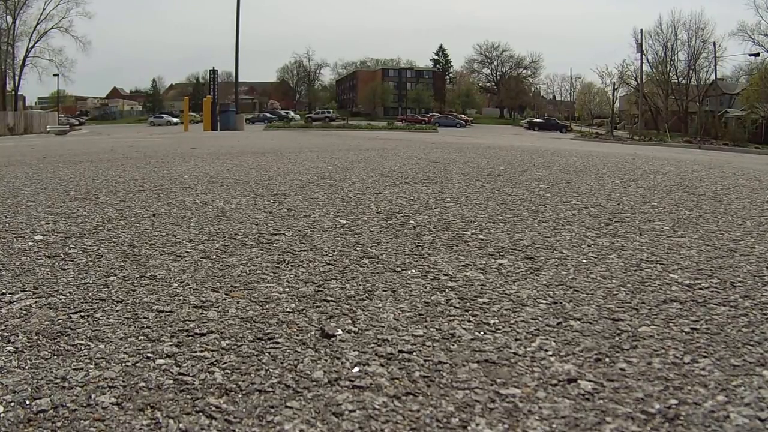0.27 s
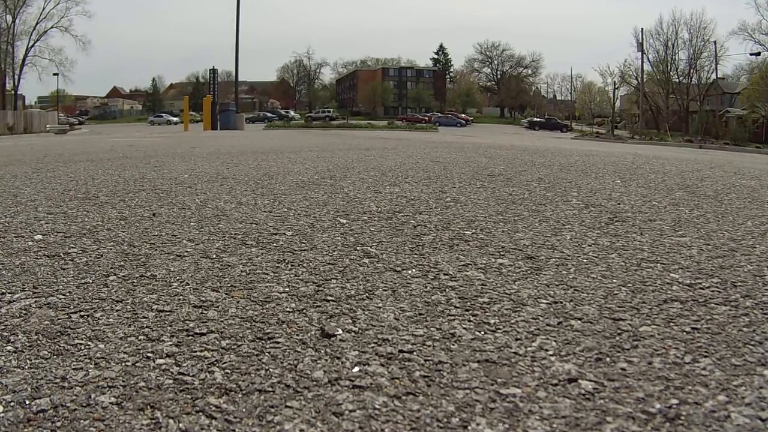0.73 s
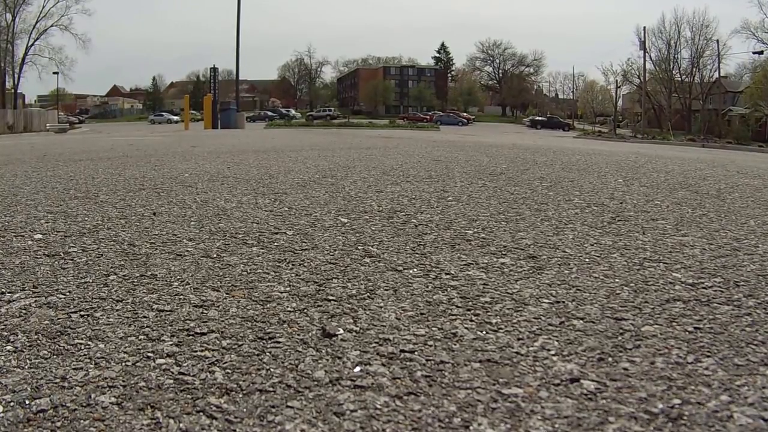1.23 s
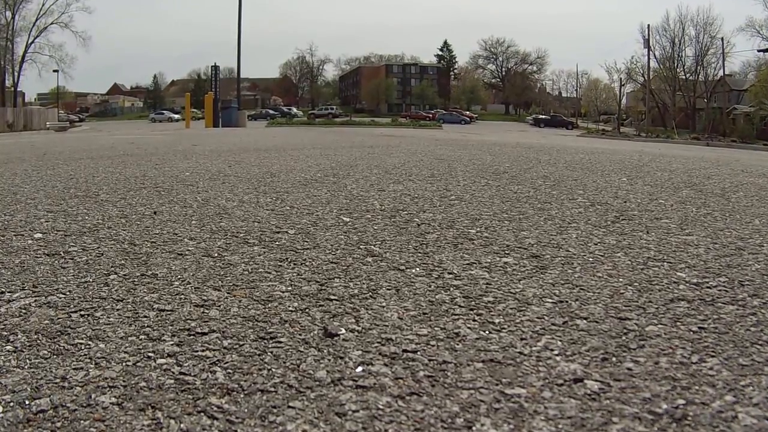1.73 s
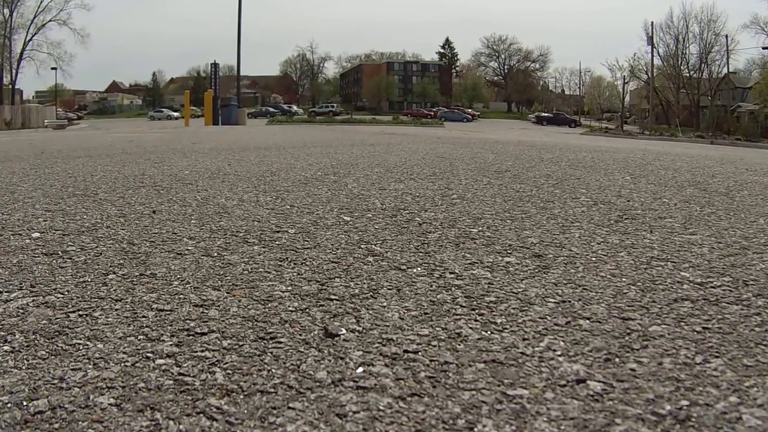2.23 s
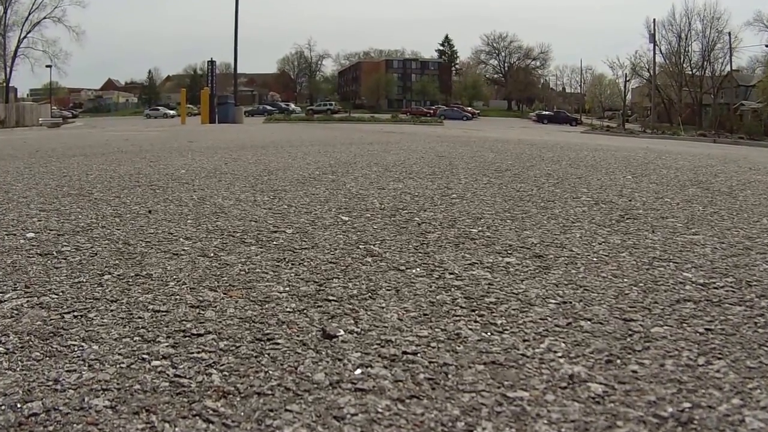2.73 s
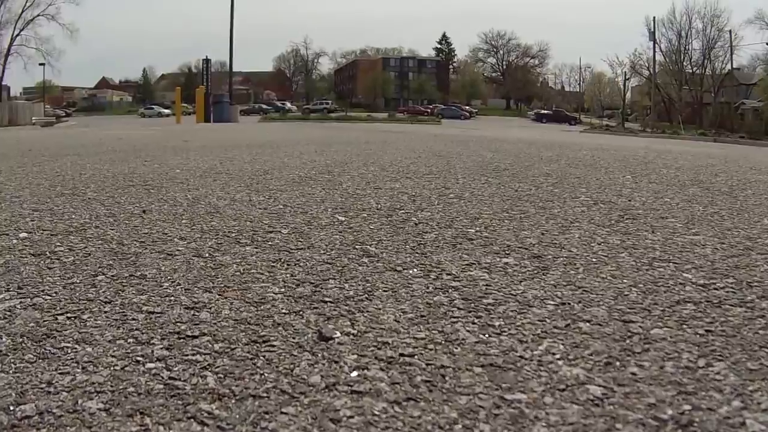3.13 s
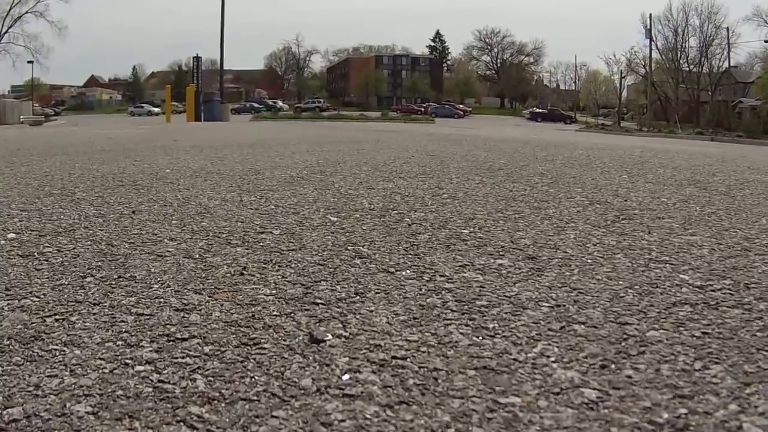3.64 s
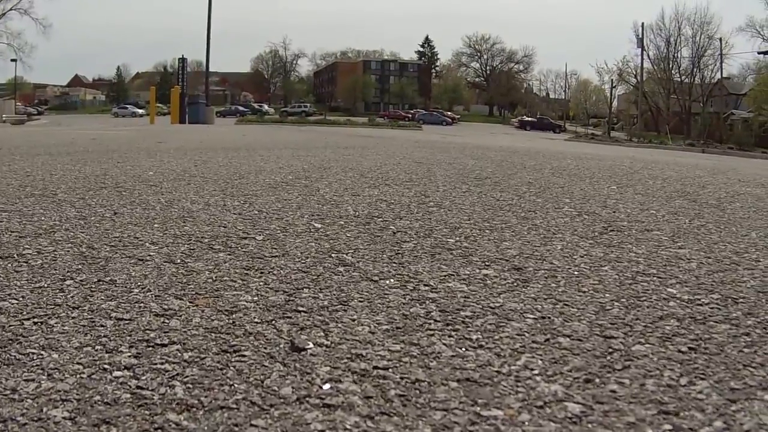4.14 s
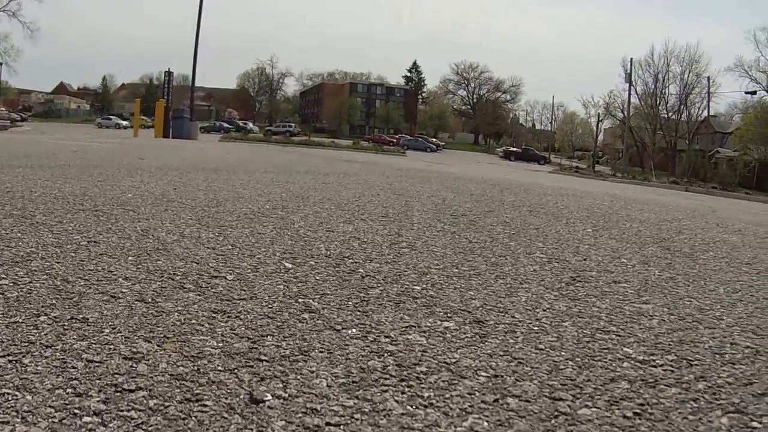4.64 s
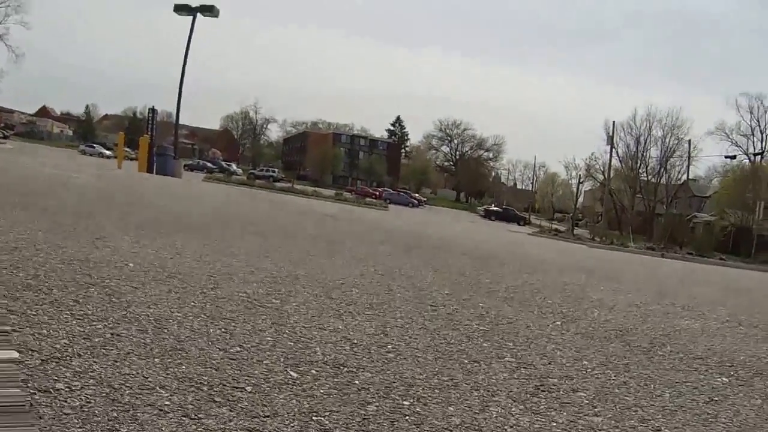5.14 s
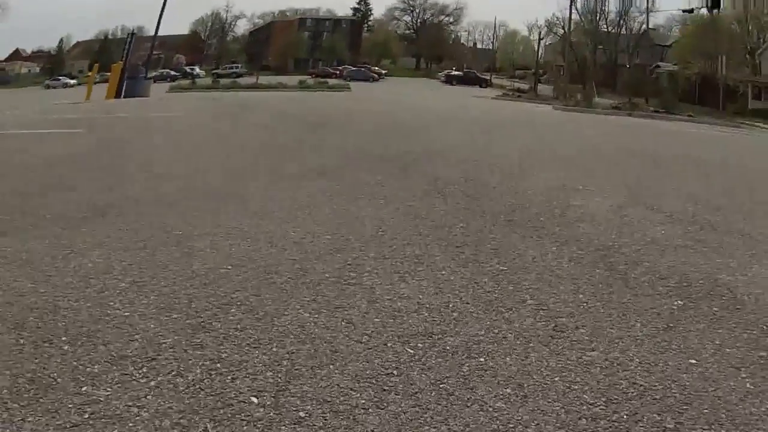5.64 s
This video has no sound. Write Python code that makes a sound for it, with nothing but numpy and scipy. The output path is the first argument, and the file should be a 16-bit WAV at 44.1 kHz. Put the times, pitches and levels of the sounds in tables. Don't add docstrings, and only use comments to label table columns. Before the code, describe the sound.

Faint wind, hum and hiss in an empty car park, then small quadcopter motors start with a piercing whine, spin up to a buzzing drone and lift off.

```python
import sys
import numpy as np
from scipy import signal
from scipy.fft import rfft, irfft, next_fast_len
from scipy.io import wavfile
from scipy.ndimage import uniform_filter1d, map_coordinates

SR = 44100
rng = np.random.default_rng(int(sys.argv[2]) if len(sys.argv) > 2 else 0)


def invert_db(level):
    return 10 ** (np.asarray(level, dtype=float) / 20)


def dump(signal):
    limited = np.clip(np.atleast_2d(signal).T, -1, 1)
    pcm = np.round(limited * 32767).astype(np.int16)
    wavfile.write(sys.argv[1], SR, pcm)


N = 258867
T = np.arange(N) / SR

# f/Hz, density/dB
HISS = [(60, 5), (240, 5.5), (600, 0), (2000, -5), (2350, -4), (3500, -11.5), (4500, -1), (5200, -10),
        (5800, -2), (7500, -8), (9300, -13), (12000, 1.5), (13600, -11.5), (15300, -8.5)]
# f/Hz, level/dB
HUM = [(1147, -63), (4587, -84), (6105, -73), (6858, -103), (7547, -91), (7838, -71), (10040, -75),
       (11380, -101), (12005, -66)]
# t/s, level/dB
CHIRPS = [(.08, -62), (.46, -57), (.8, -61), (1.25, -61), (1.62, -61)]
# f/Hz, density/dB
CHIRP_SPECTRUM = [(6400, -40), (6850, 1), (7200, -14), (7550, 1), (7900, -3), (8300, -40)]
# t/s, gain/dB
GAIN = [(1.91, 6), (2.2, 7.5), (2.45, 8.5), (3, -16)]

# t/s, level/dB
GUSTS = [(0, -48.5), (1.55, -49.5), (1.65, -55), (2.3, -53), (2.45, -36.5), (3.7, -34.5), (4.45, -40.5),
         (4.58, -31.5), (5.2, -27.5), (5.37, -22.5), (5.39, -31.5), (5.48, -38), (5.6, -38.5),
         (5.87, -37.5)]
# t/s, level over the flow/dB, half length/s
PUFFS = [(0, 13.5, .03), (.11, 8, 0.028), (.21, 8, .025), (.49, 8, 0.022), (.7, 3, 0.032),
         (.81, 8.5, 0.061), (.92, 6, 0.035), (1.1, 8, .04), (1.24, 5, 0.033), (1.41, 7, .03),
         (1.53, 4, 0.027), (2.7, 5, 0.081), (2.86, 4, .03), (3.11, 7, 0.045), (3.39, 2.5, 0.16),
         (4.77, 3, 0.048), (4.88, -6, .04), (5.0, -5, 0.053), (5.17, 5.5, 0.048), (5.235, 4, 0.012),
         (5.26, 4.5, .008), (5.275, 0, 0.011), (5.37, -4, 0.016), (5.41, 4, 0.034)]
# f/Hz, density/dB
BREEZE = [(15, -2), (45, -1.5), (100, -9), (200, -14), (500, -30), (2000, -42)]
# f/Hz, density/dB
DOWNWASH = [(15, -20), (40, -7), (90, -3.5), (300, -9.5), (700, -15.5), (2000, -27.5), (6000, -36)]
# t/s, peak level/dB, low level/dB, ring f/Hz
KNOCKS = [(3.338, -20.5, -1, 1190), (3.369, -41, -12, 1190), (4.788, -29, 16, 1190), (5.093, -25, -20, 600),
          (5.168, -27, -8, 600), (5.257, -21, -7, 1190), (5.279, -17, -10, 645.6), (5.365, -4, -25, 1000),
          (5.3615, -13, -12, 600), (5.372, -11, -14, 800), (5.378, -14, -8, 300), (5.2, -27, 0, 399.5),
          (5.233, -25, -4, 500), (5.44, -20, -30, 746)]
# f/Hz, density/dB
KNOCK_SHARP = [(150, -18), (500, 1.0), (1600, -6.5), (2200, -37)]
KNOCK_DULL = [(20, -17), (80, -7.5), (400, -9.5), (900, -73)]
RUSTLE_DB, SPIKE_DB = -7.5, 5
KNOCK_CYCLES = .62

# t/s, blade-pass f/Hz
START = [(1.91, 1.4), (1.933, 2.75), (1.934, 3.7), (1.946, 3.7), (1.947, 3.27), (1.9605, 3.27),
         (1.9615, 4.85), (1.9705, 4.85), (1.9795, 5.75), (1.988, 5.5), (1.996, 6.4), (2.0, 7), (2.02, 7.6),
         (2.05, 9.5), (2.1, 12.3), (2.2, 22), (2.3, 36), (2.36, 46)]
# t/s, blade-pass f/Hz, thump level/dB
ROTOR = [(2.42, 63.4, -30.5), (2.51, 86, -25.5), (2.63, 103.7, -20.5), (2.78, 118.5, -17),
         (2.98, 131.3, -16), (3.07, 135.7, -16), (3.381, 142.5, -15.5), (3.55, 147.7, -16),
         (3.79, 183, -14), (3.97, 194, -14.5), (4.21, 201.5, -14.5), (4.499, 218.4, -14.5),
         (4.601, 213, -14.5), (4.72, 198.5, -17.5), (4.8, 197, -17), (5.001, 186, -15.5),
         (5.18, 167.5, -19), (5.32, 193, -18.5), (5.45, 177, -21), (5.57, 185, -16.5), (5.67, 184.4, -17.5),
         (5.87, 204.4, -13.5)]
INERTIA_S = .05
LAG, LEAD = .95, .5
# t/s, blade-pass f/Hz, level/dB
OTHER = [(4.7, 125, -29), (4.85, 120, -31.5), (4.95, 132, -30), (5.05, 150, -26), (5.15, 165, -32),
         (5.25, 170, -50)]

# t/s, whine level/dB
DRIVE = [(1.93, -13), (2.25, -14), (2.42, -14.5), (2.8, -16), (2.92, -19), (3.18, -18), (3.68, -22),
         (4.06, -27), (4.27, -28), (4.5, -21.5), (4.89, -19.5), (5.28, -21), (5.4, -22.5), (5.72, -14),
         (5.87, -20.5)]
# t/s, level/dB, half length/s
SURGES = [(1.925, -2.5, .01), (1.953, 7, .004), (1.967, -2.5, .008), (2.0, 0.5, .03), (2.16, 2.5, 0.067),
          (2.24, -0.5, 0.023), (3.15, -1.5, 0.022), (3.27, 2, 0.019), (3.33, 3.5, .02), (4.17, 1, 0.067),
          (4.8, -1, 0.013), (4.99, 5, 0.05), (5.07, 4, 0.021), (5.16, 5, 0.037), (5.235, 7.5, 0.048),
          (5.27, -7, 0.011), (5.47, 3, 0.026), (5.6, -3.5, .015), (5.64, 1, 0.019), (5.74, -0.5, 0.026),
          (1.927, 1.8, .012), (1.943, 2, .004), (1.954, -2.5, .004), (1.987, -1.2, .014)]
SWITCH_HZ = 8056.4
# offset f/Hz, level/dB, starting phase/rad
SWITCHING = [
    (0, 0, 0),
    (4.24, -12, 3.1),
    (12.42, -12.5, -1.0),
    (-17.9, -21, 0),
]
SHADOW_S, SHADOW_DB = 4.7, -8.5
COLLAPSE_S = .001
SIDEBANDS = [1, 2, 3, 4, 5, 7, 10.5, 21, -1, -2, -3, -7]
SIDEBANDS_DB = [-32, -15, -18, -36, -23, -18, -16, -18, -23, -49, -19.5, -13.5]
BUZZ_DB, BUZZ_FOLLOWS = -24.5, 0.88
INRUSH_DB, INRUSH_S = 9, 0.07
LATE_KICKS_S = [1.9105, 1.9495]
LATE_KICK = .45
# f/Hz, width/Hz, level/dB
FRAME = [(2500, 640, -1.5), (4770, 670, -0.5), (8610, 1660, 3), (4000, 330, -5)]
# order [1], start t/s, end t/s
COGGING = [(42, 2.36, 2.76), (63, 2.36, 2.45), (63, 2.5, 2.64), (31.5, 2.45, 2.57), (35, 3.03, 3.52),
           (21, 2.62, 3.52), (28, 3.74, 3.95), (21, 5.19, 5.34), (21, 4.7, 5.08), (28, 4.9, 5.13),
           (28, 5.15, 5.29), (28, 5.47, 5.57), (21, 5.5, 5.95), (28, 5.59, 5.78), (21, 4.33, 4.62),
           (36.6, 3.08, 3.42), (21, 3.47, 3.78), (21, 3.74, 3.95)]
COGGING_DB = [-36, -40, -37, -37, -41.5, -37, -35.5, -36, -40, -43, -36, -39, -36.5, -35.5, -39, -42.5,
              -34.5, -45]
# order [1], start t/s, end t/s
FOLDED = [(21, 2.33, 2.66), (21, 2.6, 3.58), (42, 2.36, 2.6), (-21, 2.52, 2.79), (-42, 2.56, 2.8),
          (-14, 3.6, 4.76), (-7, 5.6, 5.95), (-10.5, 5.68, 5.95), (42, 2.55, 2.8), (10.5, 2.45, 4.1),
          (-14, 4.7, 5.04), (-42, 2.36, 2.48), (-21, 2.41, 2.53), (-63, 2.41, 2.49), (-7, 4.68, 5.05)]
FOLDED_DB = [-34, -44, -48, -37, -37.5, -38.5, -43, -42, -50, -44.5, -47, -40, -44, -43, -47]
# order [1], start t/s, end t/s
OCTAVE = [(-21, 2.34, 2.62)]
OCTAVE_DB = [-50]
# order [1], start t/s, end t/s
STEADY = [(0, 4.73, 4.95)]
STEADY_DB = [-36.5]
STEADY_HZ = 4580
SING_HZ, SING_WIDTH_HZ, SING_DB = 5107, 51, 8.5
# t/s, level/dB, half length/s
RATTLES = [(2.388, -29.5, .015), (2.428, -27.5, 0.019), (2.466, -29, .012), (2.53, -29.5, .022),
           (2.632, -32, .025), (2.703, -26, 0.028), (2.757, -36, .012), (2.85, -32, 0.031),
           (5.24, -40, 0.042), (5.532, -40, 0.039), (5.699, -34, 0.043), (5.794, -28.5, .05)]
# f/Hz, density/dB
BELL = [(4400, -23), (4850, -5), (5050, 0), (5250, -10), (5600, -38)]
HALF_DB, HALF_S = -46, .028

# t/s, level/dB, half length/s
CRACKS = [
    (5.32, -28, .04),
    (5.4, -29, .04),
    (5.5, -33, .06),
]
# f/Hz, density/dB
CRACK = [(700, -27), (2000, 7), (6000, -1), (11000, -15), (15300, -14)]
# t/s, level/dB, half length/s, f/Hz
SNAPS = [(2.86, -39, 0.012, 600), (2.958, -38, 0.0094, 1100), (3.11, -35, 0.017, 650),
         (3.325, -29.5, 0.023, 851.6), (3.376, -36, 0.03, 800), (3.65, -43, .04, 800),
         (3.76, -36, .025, 800), (4.241, -38, .012, 900), (4.443, -42, 0.032, 746),
         (4.53, -38, 0.034, 1250), (4.602, -39, 0.041, 1260), (4.947, -41, 0.09, 1400),
         (3.2, -31, .02, 3700), (3.32, -34, .012, 4000), (3.77, -35, 0.024, 2900),
         (3.925, -42, 0.032, 4103), (3.94, -39, .03, 2700), (4.02, -36, .012, 4100),
         (4.044, -33, .03, 2700), (4.11, -38, .022, 2744), (4.261, -30, 0.016, 2900),
         (4.27, -35, .02, 4200), (4.37, -30, 0.028, 4300), (4.39, -39, .012, 2800),
         (4.52, -28.5, 0.029, 3700), (4.527, -41, .02, 2609), (4.709, -29, .012, 3500),
         (4.772, -27.5, .014, 3704), (4.832, -42, 0.019, 3000), (4.863, -30, .015, 3300),
         (5.186, -46, .03, 2000), (5.53, -37, 0.048, 2120)]
SNAP_CYCLES = 1.36
# t/s, f/Hz
CORE = [(2.4, 1700), (3.73, 1600), (3.8, 2200), (3.87, 1600), (3.92, 1800), (3.96, 2400), (4.01, 1850),
        (4.06, 2150), (4.08, 1600), (4.11, 2050), (4.15, 1700), (4.21, 2000), (4.26, 1650), (4.31, 1600),
        (4.345, 2250), (4.39, 1600), (4.44, 2000), (4.55, 1600), (4.79, 1450), (4.845, 2300), (4.865, 1600),
        (5.2, 1500)]
CORE_CYCLES, CORE_LEAN = .7, .9
ECHO_S, ECHO_SWING_S, ECHO_SHARE = .0011, .00015, .35
# t/s, level/dB
WAKE = [(2.42, -46.5), (2.66, -32.5), (3.3, -31), (3.76, -28), (4.1, -30), (4.4, -28.5), (4.7, -32.5),
        (5.0, -34.5), (5.24, -26.5), (5.38, -28), (5.54, -27), (5.63, -37.5), (5.87, -39.5)]
# t/s, level/dB, half length/s
VORTEX = [(2.7, -1, 0.18), (2.95, 2.5, 0.033), (3.05, 3, .04), (3.2, 4, 0.021), (3.235, 7.5, 0.014),
          (3.275, -10, 0.022), (3.33, 9, 0.031), (3.76, 10.5, 0.029), (3.85, 1, .012), (3.88, 5, .012),
          (3.91, 6.5, 0.016), (3.98, -4, 0.027), (4.03, 6, 0.028), (4.075, 4, 0.017), (4.11, 2, 0.019),
          (4.18, -4, .02), (4.215, 5, 0.018), (4.3, -1, .025), (4.352, 3.5, .015), (4.385, -1, 0.013),
          (4.44, -14, 0.031), (4.52, 5.5, 0.044), (4.6, 6, 0.056), (4.745, 8.5, 0.038), (4.68, 6, .04),
          (4.8, 8.5, 0.026), (4.83, 12, 0.023), (4.88, 12.5, 0.031), (4.94, 7.5, 0.025), (5.0, 11, 0.045),
          (5.27, -9, 0.022), (5.31, 10.5, 0.057), (5.367, 8, 0.0065), (5.4, -16, 0.014)]
# t/s, share [0-1]
TIGHT = [(2.4, 0.66), (3.72, 0.6), (3.785, 0.42), (3.81, 0.7), (4.42, 0.93), (4.5, 0.92), (5.1, 0.7),
         (5.5, 0.63)]
# f/Hz, density/dB
SLAP = [(410, -51), (700, -26), (807, -10), (918, -17.5), (1620, -3), (7720, -6), (8230, -1), (8560, -2),
        (15300, -39)]
# f/Hz, density/dB
SMACK_LOW = [(400, -15), (700, 3.5), (1300, -12.5), (1700, -0.5), (2600, -19)]
# f/Hz, density/dB
SMACK_HIGH = [(1100, -6), (1700, 3), (2300, -5), (3500, 4.5), (7000, 18), (15300, -40)]
# f/Hz, density/dB
TIPS = [(6000, -35), (9500, 6.5), (15300, 3.0)]
LOW_DB, LOW_GROWS, LOW_PER_OCTAVE_DB = -36.5, 1.5, 5.5
TIP_DB, TIP_GROWS, HIGH_SHARE = -39, 0.32, 0.18
AIRBORNE_S, AIRBORNE_TIP_DB = 4.77, 3
DUCK_S, DUCK_DB, DUCK_HALF_S = 5.37, -12, .09

SLOW_HZ, SHARPER_DB = 147, 5
SECOND_DB, THIRD_DB = -7.5, -14
THIRD_FADES_DB, UPPER_FADES_DB = -9, -13
UPPER = [4, 5, 6, .5, 1.5, 2.5]
UPPER_DB = [-5, -19, -30, -19.5, -11.5, -31]
IN_STEP = [5.17, 5.34, 5.51, 5.66, 5.851]
TWIN_FROM_S, ODD_SWING_DB, EVEN_SWING_DB = 5.24, 3, 6
# t/s, level/dB, half
# length/s
MEET = [(5.075, -3, 0.009), (5.098, 3.5, 0.011), (5.138, -3, .014), (5.2, -5.5, .03), (5.275, -7, 0.013),
        (5.342, 1.5, .015), (5.367, -9, .006), (5.458, -15, 0.0099)]
# t/s, level/dB, half length/s
MEET_OCTAVE = [(5.1, -2, .01), (5.156, 2, .01), (5.3, -9, 0.019), (5.33, 8, .015), (5.435, -11, 0.017),
               (5.46, 7, .012)]
TOP_HZ = 15380


def unit(x):
    return x / np.sqrt(np.mean(x ** 2) + 1e-20)


def along(points, hz):
    f, v = np.transpose(points)
    return np.interp(np.log(hz + 1), np.log(f + 1), v)


def curves(rows):
    s, *cols = np.transpose(rows)
    return [np.interp(T, s, c) for c in cols]


def ramp(start, length):
    return np.clip((T - start) / length, 0, 1)


def wobble(rate):
    coarse = np.arange(0, N + 32, 32) / SR
    knots = rng.standard_normal(int(N * rate / SR) + 4)
    return np.interp(T, coarse, map_coordinates(knots, [coarse * rate]))


def bumps(rows):
    coarse = T[::16]
    total = sum(db * np.exp(-((coarse - s) / half) ** 2) for s, db, half in rows)
    return np.interp(T, coarse, total)


def bursts(rows):
    return sum(invert_db(db) * np.exp(-((T - s) / half) ** 2) for s, db, half in rows)


def filtered(x, response):
    m = next_fast_len(N + 8192)
    return irfft(rfft(x, m) * response(np.fft.rfftfreq(m, 1 / SR)), m)[:N]


def noise(spectrum):
    return unit(filtered(rng.standard_normal(N), lambda hz: invert_db(along(spectrum, hz))))


def tone(angle):
    return np.sqrt(2) * np.sin(angle)


def blade_angle():
    rate = curves(START + [row[:2] for row in ROTOR])[0] * (T > START[0][0])
    rate = np.where(T > 2.3, uniform_filter1d(rate, size=round(INERTIA_S * SR)), rate)
    return 2 * np.pi * np.cumsum(rate) / SR, rate


def background():
    hum = sum(invert_db(db + wobble(8.6)) * tone(2 * np.pi * hz * T + 0.16 * wobble(20.0)) for hz, db in HUM)
    awake = sum(invert_db(db) * np.exp(-((T - s) / 0.032) ** 4) for s, db in CHIRPS)
    chirp = awake * noise(CHIRP_SPECTRUM)
    return invert_db(curves(GAIN)[0]) * (invert_db(-51) * noise(HISS) + hum + chirp)


def wind():
    wash = ramp(2.35, 0.15)
    breeze = unit(invert_db(1.7 * wobble(32.7)) * noise(BREEZE))
    downwash = unit(invert_db(1.5 * wobble(25) + 1.8 * wobble(70)) * noise(DOWNWASH))
    flow = (1 - wash) * breeze + invert_db(2.5) * wash * downwash
    out = invert_db(curves(GUSTS)[0] + bumps(PUFFS)) * flow
    sharp, dull = noise(KNOCK_SHARP), noise(KNOCK_DULL)
    for s, db, low_db, hz in KNOCKS:
        decay = np.where(T > s + .001, .004, .001)
        out += invert_db(db + RUSTLE_DB) * np.exp(-abs(T - s - .001) / decay) * sharp
        cycles = (T - s - .0015) * hz
        spike = np.exp(-(cycles / KNOCK_CYCLES) ** 2) * np.cos(2 * np.pi * cycles)
        out -= invert_db(db + SPIKE_DB) * spike
        out += invert_db(db + low_db) * np.exp(-abs(T - s) / 0.01) * dull
    return out


def other_rotor():
    rate, level_db = curves(OTHER)
    angle = 2 * np.pi * np.cumsum(rate) / SR
    thump = tone(angle) + 0.45 * tone(2 * angle) + 0.19 * tone(3 * angle)
    folded = .25 * tone(2 * np.pi * SWITCH_HZ * T - 7 * angle)
    return invert_db(level_db) * (T > 4.7) * (T < 5.25) * (thump + folded)


def frame(hz):
    return sum((-1) ** k * invert_db(db) * 1j * hz * w / (c * c - hz * hz + 1j * hz * w)
               for k, (c, w, db) in enumerate(FRAME))


def bell(since, carrier):
    half_tone = invert_db(HALF_DB) * (since > 0) * np.clip((HALF_S - since) / 0.0089, 0, 1) * tone(carrier / 2)
    return bursts(RATTLES) * unit(invert_db(2 * wobble(90)) * noise(BELL)) + half_tone


def whistles(rows, levels_db, angle, carrier):
    out = np.zeros(N)
    for (k, start, end), db in zip(rows, levels_db):
        on = (T > start) & (T < end)
        phase = (carrier + k * angle)[on]
        hz = np.gradient(phase) * SR / (2 * np.pi)
        sing_db = SING_DB * np.exp(-((hz - SING_HZ) / SING_WIDTH_HZ) ** 2)
        fade = np.clip(np.minimum(T[on] - start, end - T[on]) / .04, 0, 1)
        level = fade * invert_db(db + sing_db + 1.2 * wobble(16)[on])
        out[on] += level * tone(phase + .2 * wobble(40)[on])
    return out


def motors(angle, rate):
    since = T - START[0][0]
    whine_db = curves(DRIVE)[0] + bumps(SURGES)
    inrush_db = INRUSH_DB * np.exp(-abs(since) / INRUSH_S)
    buzz_db = BUZZ_DB + BUZZ_FOLLOWS * (whine_db + 17.5) + inrush_db
    step = 21 * angle / (2 * np.pi) % 1
    depth = .95 * np.clip((2.3 - T) / .27, 0, 1) * (21 * angle > 2 * np.pi)
    collapse = 1.35 * np.exp(-step / (21 * rate * COLLAPSE_S + 1e-9))
    current = step - .8 - .35 * np.exp(-step / .15) + collapse
    swell = uniform_filter1d(1 + depth * current, size=24)
    carrier = 2 * np.pi * SWITCH_HZ * since + 1.2 * ramp(2.267, 0.0028)
    whine = np.zeros(N)
    for hz, db, phase in SWITCHING:
        shadow_db = (hz != 0) * SHADOW_DB * ramp(SHADOW_S, 0.071)
        drive_phase = carrier + 2 * np.pi * hz * since + phase + 0.3 * wobble(60)
        whine += invert_db(db + shadow_db + 0.18 * wobble(39)) * tone(drive_phase)
    lines = sum(invert_db(db + 2.8 * wobble(11)) * tone(carrier + k * angle + .3 * wobble(25))
                for k, db in zip(SIDEBANDS, SIDEBANDS_DB))
    glides = whistles(COGGING, COGGING_DB, angle, 0)
    glides += whistles(FOLDED, FOLDED_DB, angle, carrier)
    glides += whistles(OCTAVE, OCTAVE_DB, angle, 2 * carrier)
    glides += whistles(STEADY, STEADY_DB, angle, 2 * np.pi * STEADY_HZ * T)
    kick = np.exp(-step / np.maximum(21 * rate * 0.0006, 1e-4)) * np.clip(since / 0.075, .4, 1)
    ticks = kick * rng.standard_normal(N)
    late = sum(np.exp(-abs(T - s) / .0006) for s in LATE_KICKS_S)
    ticks += LATE_KICK * late * rng.standard_normal(N)
    rattle = .5 * ramp(1.89, 0.32) * rng.standard_normal(N) + 0.87 * ticks
    buzz = invert_db(buzz_db) * (lines * ramp(1.95, 0.27) + invert_db(2.5) * rattle)

    def radiation(hz):
        return frame(hz) / (1 + (2100 / (hz + 1)) ** 8) / (1 + (hz / 12000) ** 6)

    direct = np.clip(since / 0.0007, 0, 1) * swell * invert_db(whine_db) * whine
    return direct + glides + bell(since, carrier) + filtered((since > 0) * buzz, radiation)


def cracks(angle):
    spike = np.exp(900 * (np.cos(angle + LEAD + .02 * wobble(120)) - 1)) * invert_db(2.5 * wobble(110))
    late = T > 5
    crack = unit(filtered(spike * late, lambda hz: invert_db(along(CRACK, hz))) * late)
    return bursts(CRACKS) * crack * np.sqrt(1 - 5 * SR / N)


def since_blade(angle, rate, jitter):
    turn = (angle + LEAD + jitter * wobble(120) + np.pi) % (2 * np.pi) - np.pi
    return turn / (2 * np.pi * (rate + 1))


def snaps(angle, rate):
    since = since_blade(angle, rate, .01)
    out, size = np.zeros(N), invert_db(1.6 * wobble(90))
    for s, db, half, hz in SNAPS:
        on = abs(T - s) < 3 * half
        cycles, width = since[on] * hz, SNAP_CYCLES * (hz / 3000) ** .3
        envelope = np.exp(-((T[on] - s) / half) ** 2 - (cycles / width) ** 2)
        out[on] -= invert_db(db + 12) * envelope * np.cos(2 * np.pi * cycles + CORE_LEAN)
    return size * out


def core(angle, rate):
    since = since_blade(angle, rate, .015)
    hz = curves(CORE)[0] * (1 + .03 * wobble(30))

    def wavelet(s):
        return -np.exp(-(s * hz / CORE_CYCLES) ** 2) * np.cos(2 * np.pi * hz * s + CORE_LEAN)

    echo = wavelet(since + ECHO_S + ECHO_SWING_S * wobble(14))
    return unit((T > 2.35) * invert_db(1.2 * wobble(90)) * (wavelet(since) + ECHO_SHARE * echo))


def slap(angle, rate):
    wake_db, vortex_db = curves(WAKE)[0], bumps(VORTEX)
    low_db = LOW_DB + LOW_GROWS * (wake_db + 32.0) + vortex_db
    low_db += LOW_PER_OCTAVE_DB * np.log2((rate + 1) / 150)
    high_db = wake_db + HIGH_SHARE * vortex_db + 1.0 * wobble(12)
    tip_db = TIP_DB + TIP_GROWS * (wake_db + 31.5) + 1.0 * wobble(9.1)
    tip_db += AIRBORNE_TIP_DB * ramp(AIRBORNE_S, 0.15)

    def click(scatter):
        pulse = np.exp(250 * (np.cos(angle + LEAD + scatter * wobble(120)) - 1))
        return -pulse * invert_db(1.2 * wobble(90))

    def smack(spectrum, scatter, lean):
        return unit(filtered(click(scatter), lambda hz: invert_db(along(spectrum, hz)) * np.exp(1j * lean)))

    tight = np.clip(curves(TIGHT)[0] + 0.1 * wobble(12), 0, 1)
    low = (1 - tight) * smack(SMACK_LOW, .015, CORE_LEAN) + tight * core(angle, rate)
    high = smack(SMACK_HIGH, .035, -CORE_LEAN)
    gate = 0.34 + np.exp(4 * (np.cos(angle + LEAD) - 1)) * invert_db(1.7 * wobble(70))
    swish = unit(gate * noise(SLAP))
    tips = unit((gate + 0.11) * noise(TIPS))
    clicks = invert_db(low_db - 3.5) * low + invert_db(high_db - 6.5) * high
    clicks *= invert_db(bumps([(DUCK_S, DUCK_DB, DUCK_HALF_S)]))
    return ramp(2.35, 0.033) * (clicks + invert_db(high_db + 4.0) * swish + invert_db(tip_db + 4.0) * tips)


def rotor(angle, rate):
    level_db, octaves = curves(ROTOR)[1], np.log2((rate + 1) / SLOW_HZ)
    faster = np.clip(octaves, 0, 1)
    twin = np.cos(2 * np.pi * np.interp(T, IN_STEP + [6.05], np.arange(6))) * ramp(TWIN_FROM_S, .05)
    first_db = level_db + ODD_SWING_DB * twin + bumps(MEET)
    sharp_db = level_db + SHARPER_DB * np.clip(-octaves, 0, 1)
    second_db = sharp_db + SECOND_DB - EVEN_SWING_DB * twin + bumps(MEET_OCTAVE)
    third_db = sharp_db + THIRD_DB + THIRD_FADES_DB * faster
    upper_db = sharp_db + THIRD_DB + UPPER_FADES_DB * faster
    thump = invert_db(first_db + 0.38 * wobble(30)) * tone(angle)
    thump += invert_db(second_db + 1.06 * wobble(15)) * tone(2 * angle - LAG)
    thump += invert_db(third_db + 2.63 * wobble(30)) * tone(3 * angle - 2 * LAG + .2 * wobble(45))
    for k, db in zip(UPPER, UPPER_DB):
        phase = k * angle - LAG * (k - 1) + 0.43 * wobble(45)
        thump += invert_db(upper_db + db + 3.7 * wobble(16)) * tone(phase)
    return ramp(2.35, 0.11) * thump


def scene():
    angle, rate = blade_angle()
    air = background() + wind()
    machine = other_rotor() + motors(angle, rate)
    blades = cracks(angle) + snaps(angle, rate) + slap(angle, rate) + rotor(angle, rate)
    return (air + machine + blades)[None]


def band_limit(x):
    return signal.sosfilt(signal.butter(12, 15570, fs=SR, output="sos"), x)


def record(dry):
    held = dry[0] / (1 + abs(dry[0]) ** 14) ** (1 / 14)
    mix = filtered(held, lambda hz: hz < TOP_HZ)[None]
    return band_limit(mix)


dry = scene()
out = record(dry)
dump(out)
```